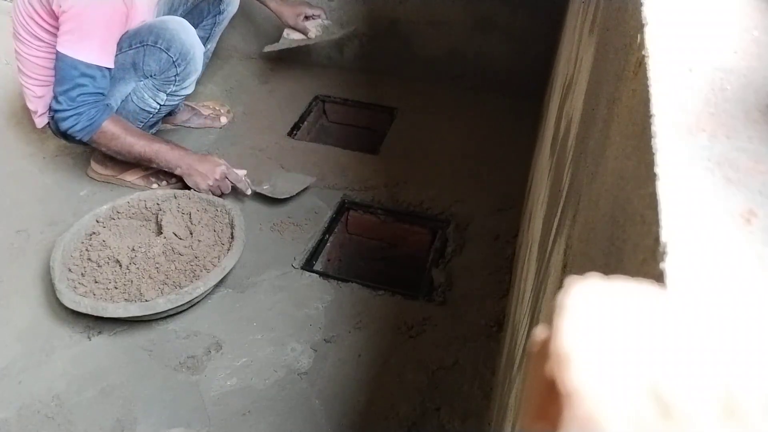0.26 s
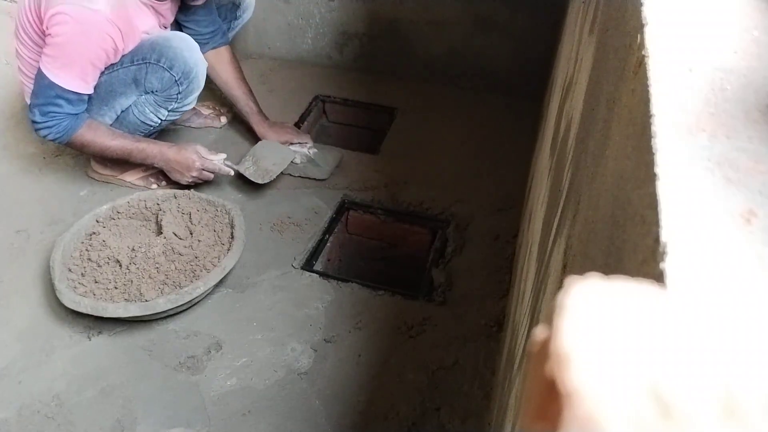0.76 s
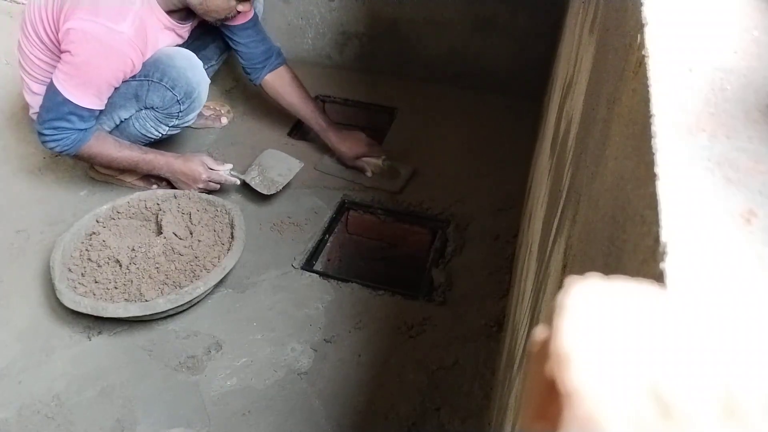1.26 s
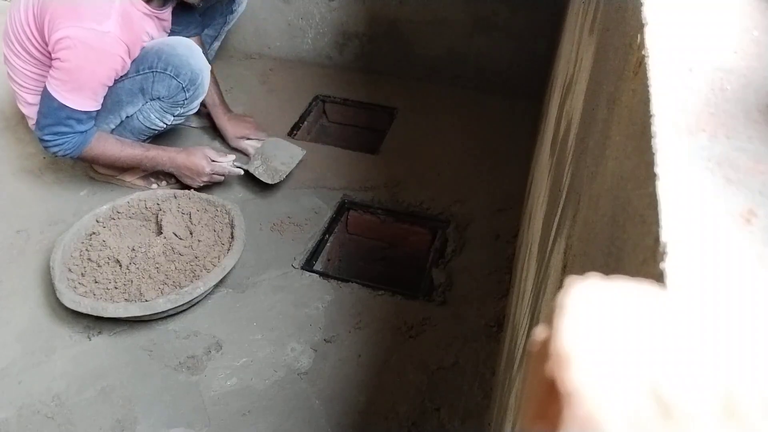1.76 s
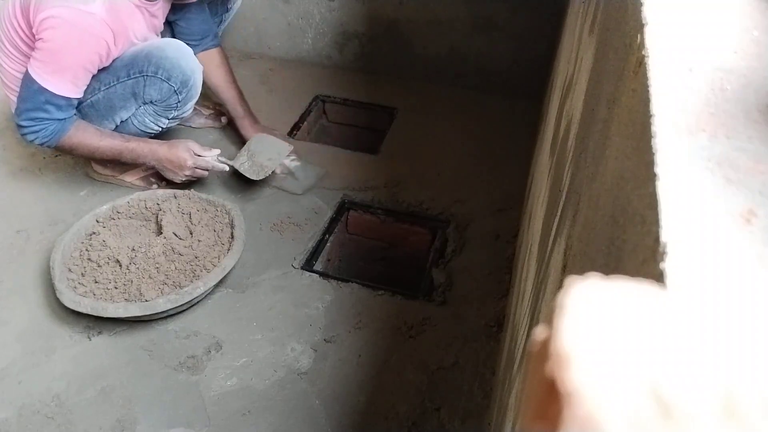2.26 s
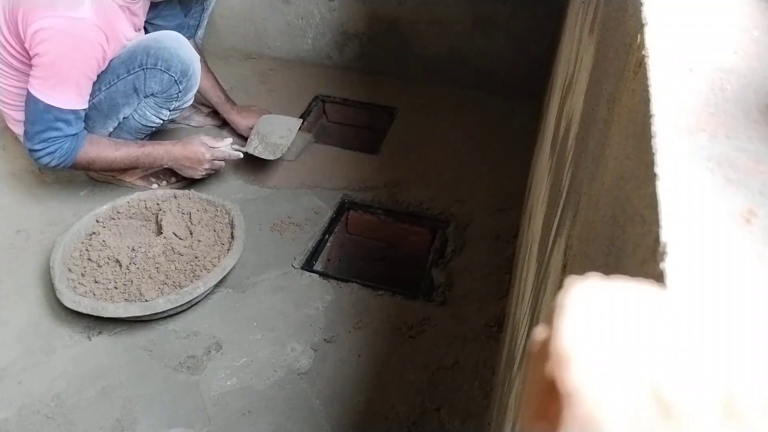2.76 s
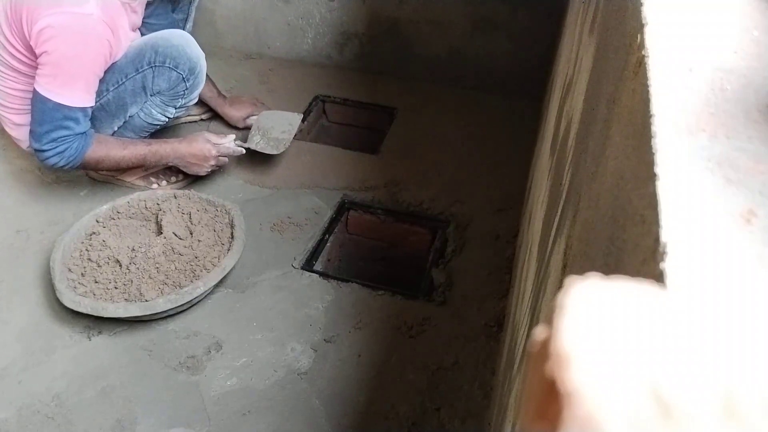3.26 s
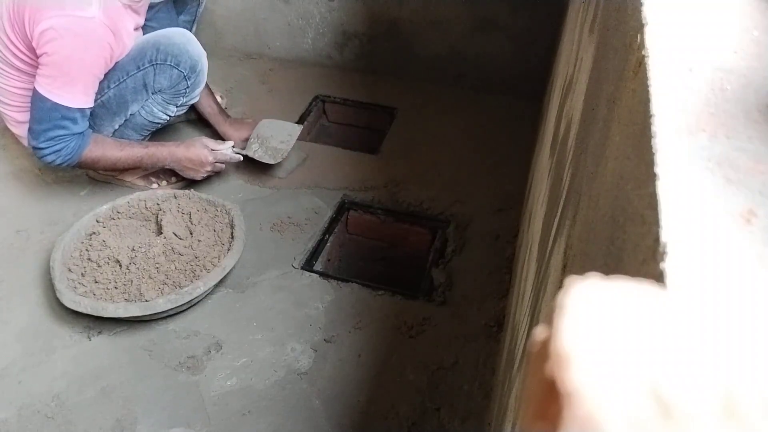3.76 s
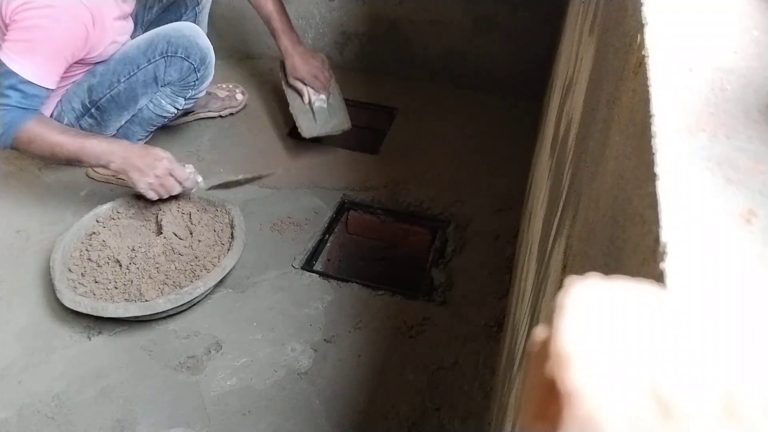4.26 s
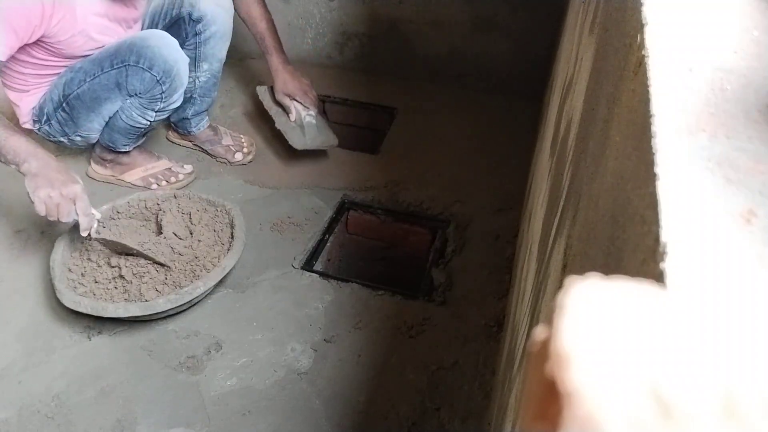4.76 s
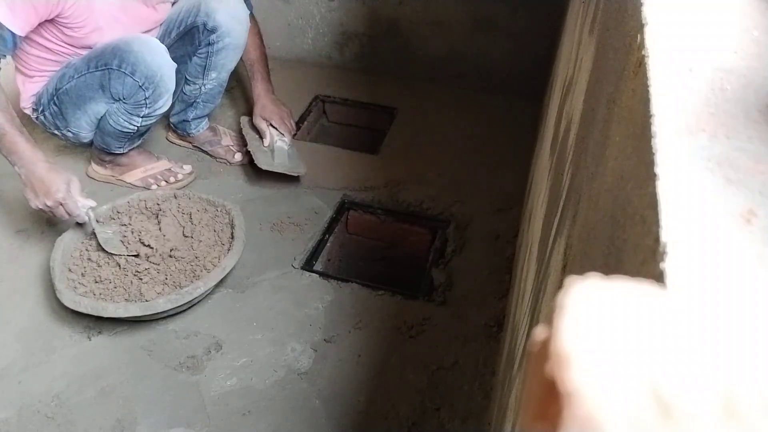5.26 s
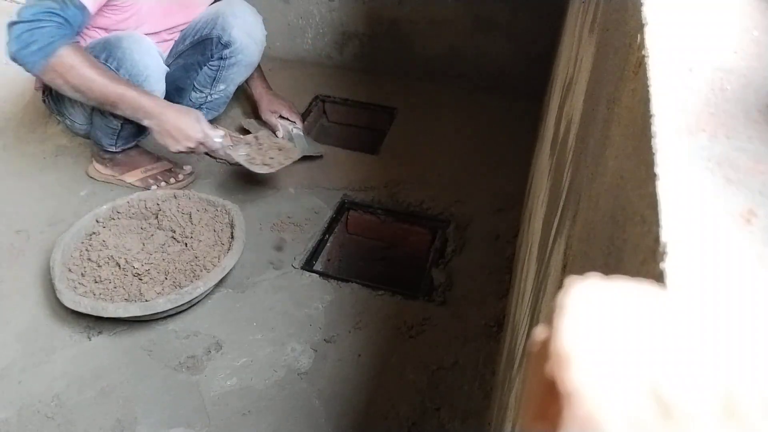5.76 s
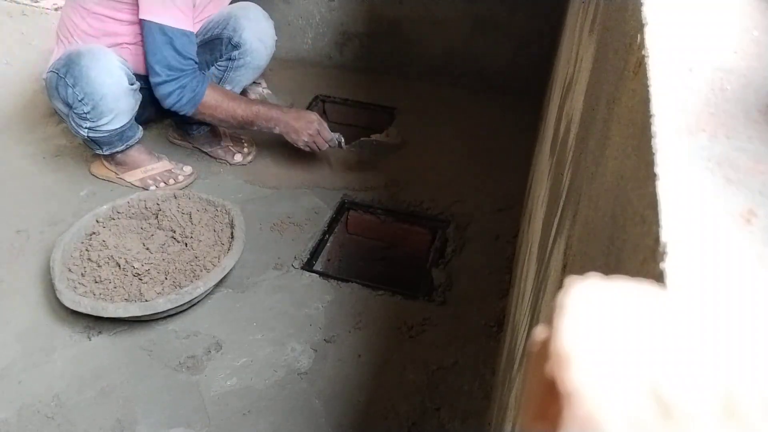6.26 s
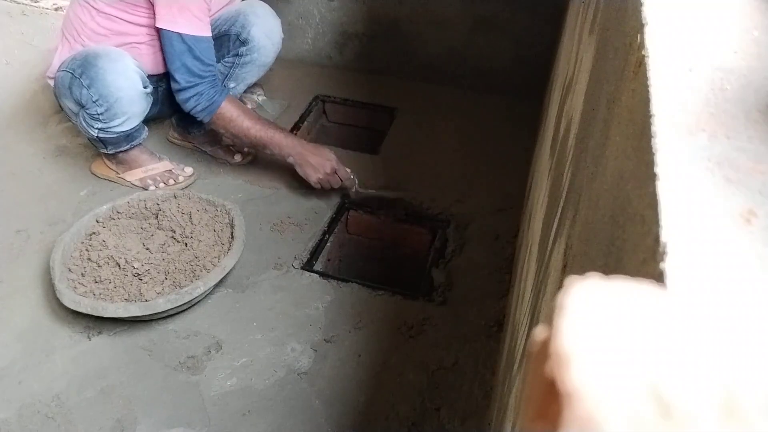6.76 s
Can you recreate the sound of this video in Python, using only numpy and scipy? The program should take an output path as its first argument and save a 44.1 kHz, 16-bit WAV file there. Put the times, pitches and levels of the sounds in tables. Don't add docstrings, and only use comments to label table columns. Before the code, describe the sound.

In a bare concrete building, a float rubs sandy mortar close to a phone. From 0 s short gritty strokes swell and fade unevenly, at about 0, 0.3, 1.1, 1.6 and 2.4 s, then closer together to 3.9 s, strongest near 3.5 s. Each has a dry mid-high rasp, fine sandy hiss and some low board tone, heaviest around 2 s. A soft bump falls at 1.5 s, a firmer double bump at 3 s. Hammer blows from another room arrive at 3.5, 4.4, 5.2, 6.05 and 6.95 s: the first softer, the second hollow, the next harder, the last thin and cut off by the ending. They come as clustered hard-wall echoes with a faint steel ring and long reverberation. Scraping becomes sparse: a light rub at 5.2 s, a sharp blade tick and brief scrape near 6.55 s, faint sandy touches at 6.9 s. Low distant rumble continues throughout, gently swelling.

```python
import sys
import numpy as np
from scipy import signal
from scipy.fft import rfft, irfft, next_fast_len
from scipy.io import wavfile
from scipy.ndimage import uniform_filter1d

SR = 44100
rng = np.random.default_rng(int(sys.argv[2]) if len(sys.argv) > 2 else 0)


def how_loud(loudness_db):
    steps = np.asarray(loudness_db, float) / 20
    return 10 ** steps


def to_wav(sig):
    pcm = np.clip(np.atleast_2d(sig), -1, 1) * 32767
    pcm = np.round(pcm).astype(np.int16)
    wavfile.write(sys.argv[1], SR, pcm.T)


N = 309141
GRID = next_fast_len(N + 2 * SR)
HZ = np.fft.rfftfreq(GRID, 1 / SR)


def unit(x):
    return x / np.sqrt(np.mean(x ** 2) + 1e-20)


def along(points, hz, axis=1):
    rows = np.transpose(points)
    return np.interp(np.log(hz + 1), np.log(rows[0] + 1), rows[axis])


def curves(rows):
    s, *columns = np.transpose(rows)
    return [np.interp(np.arange(N) / SR, s, column) for column in columns]


def filtered(x, response):
    return irfft(rfft(x, GRID) * response, GRID)[..., :N]


def resonances(modes):
    total = 0
    for k, (centre, width, db) in enumerate(modes):
        damping = 1j * HZ * width
        total = total + (-1) ** k * how_loud(db) * damping / (centre ** 2 - HZ ** 2 + damping)
    return total


def causal(gain):
    cepstrum = irfft(np.log(gain + 1e-6), GRID)
    cepstrum[1:GRID // 2] *= 2
    cepstrum[GRID // 2 + 1:] = 0
    return np.exp(rfft(cepstrum))


def patchy(depth_db):
    z = signal.stft(rng.standard_normal((2, N)), nperseg=512)[2]
    field = uniform_filter1d(rng.standard_normal(z.shape[1:]), size=6, axis=0)
    field = uniform_filter1d(field, size=10, axis=1)
    return signal.istft(z * how_loud(depth_db * unit(field)), nperseg=512)[1][:, :N]


def leftward(field, share):
    return np.array([field[0], field[1] + share * field[0]])


# (frequency [Hz], t60 [s])
ROOM_T60 = [(100, 0.87), (300, 2.3), (600, 1.36), (1200, 1.666), (1900, 1.365), (2900, 1.36), (4850, 0.97),
            (8000, 0.72), (15000, 0.51)]


def tail(faster):
    _, t, z = signal.stft(rng.standard_normal((2, 2 * SR)), SR, nperseg=512)
    decay_db = -60 * faster * t / along(ROOM_T60, np.fft.rfftfreq(512, 1 / SR))[:, None]
    return signal.istft(z * how_loud(decay_db), SR, nperseg=512)[1][:, :2 * SR]


# (peak [s], rise [s], fall [s], board level [dB], sand hiss over board [dB])
STROKES = [(0.0, .05, 0.093, -46.5, -6), (.18, 0.015, 0.069, -66, 10), (.285, 0.087, .12, -44, 1.5),
           (.62, 0.33, 0.21, -56.5, -8), (1.13, 0.16, 0.2, -47.5, -6), (1.56, 0.13, 0.28, -43, -5),
           (1.78, 0.067, 0.081, -53.5, -9), (2.05, 0.079, 0.1, -55, -15), (2.224, 0.019, 0.14, -51.5, -20),
           (2.41, 0.16, 0.24, -42.5, -5.5), (2.8, 0.09, .13, -42.5, -8), (3.05, 0.087, 0.17, -44, -9),
           (3.36, 0.068, 0.13, -47, -3), (3.5, 0.1, 0.22, -38.5, -13.5), (3.88, 0.16, 0.21, -44, -9.5),
           (4.87, 0.03, 0.25, -72.5, 6), (5.2, 0.23, 0.061, -53, 0), (5.826, .004, .006, -67, -6),
           (6.565, 0.013, 0.14, -52, -7), (6.908, 0.031, .01, -72, 0), (6.95, 0.027, 0.033, -70, 1)]


def strokes(swing, sandy):
    fade_db, roundness = 12, 1.49
    t = np.arange(0, N / SR + .002, .001)
    swell = 0
    for peak, rise, fall, db, sand_db in STROKES:
        distance = np.abs(t - peak) / np.where(t < peak, rise, fall)
        swell = swell + how_loud(db + sandy * sand_db - swing * fade_db * distance ** roundness)
    return np.interp(np.arange(N) / SR, t, swell)


def grit(spread_db, share):
    crushed = rng.random(N) < .08
    sizes = how_loud(spread_db * np.minimum(rng.exponential(size=N), 4)) * crushed
    return share * unit(sizes * rng.standard_normal((2, N))) + patchy(depth_db=.7)


def rubbed(response, spread_db, share):
    return unit(filtered(grit(spread_db, share), response))


# (frequency [Hz], width [Hz], level [dB])
BOARD = [(1960, 790, -1.5), (3080, 770, 1), (3500, 580, -1)]


def board():
    return strokes(swing=0.75, sandy=0) * rubbed(resonances(BOARD), spread_db=7, share=0.65)


# (frequency [Hz], width [Hz], level [dB])
EDGE = [(3830, 1140, 1.5), (5460, 1800, -2.5)]


def edge():
    return how_loud(-0.5) * strokes(swing=0.81, sandy=0.47) * rubbed(resonances(EDGE), spread_db=3.0, share=0.87)


# (frequency [Hz], width [Hz], level [dB])
LOW_BOARD = [(270, 68, 1), (470, 50, -8), (775, 270, -6)]
FLEX_HZ = (812, 1115, 1340)
# (time [s], low notes over board [dB], bending note [Hz])
WEIGHT = [
    (0, -14, 930),
    (.3, -8, 1280),
    (.9, -5, 980),
    (1.9, -0.5, 1000),
    (2.3, -3, 1050),
    (2.6, -5, 1120),
    (3.0, -8.5, 1310),
    (3.5, -5.5, 1214),
    (3.7, -32, 1250),
]


def low_notes():
    low_db, flex_hz = curves(WEIGHT)
    flex = 0
    for hz in FLEX_HZ:
        closeness = np.exp(-((flex_hz - hz) / 190) ** 2)
        flex = flex + closeness * rubbed(resonances([(hz, 330, 0)]) ** 2, spread_db=3.0, share=0.2)
    body = rubbed(resonances(LOW_BOARD), spread_db=4.5, share=0.29)
    return how_loud(low_db) * strokes(swing=0.55, sandy=0) * (0.7 * flex + 0.6 * body)


# (frequency [Hz], level per Hz [dB])
SAND = [(4000, -48), (6500, 4), (8000, 1), (12000, 3.5), (15500, 1.5)]


def sand():
    hiss = rubbed(how_loud(along(SAND, HZ)), spread_db=7.0, share=0.3)
    dust = filtered(hiss, 1 / (1 + (11500 / (HZ + 1)) ** 8))
    coarse = strokes(swing=0.94, sandy=0.88) * (hiss - dust)
    return coarse + how_loud(1.5) * strokes(swing=1.05, sandy=1.78) * dust


def scraping():
    near = board() + edge() + low_notes() + sand()
    walls = tail(faster=3.3)
    blur = filtered(near, rfft(walls / np.linalg.norm(walls[0]), GRID))
    return near + how_loud(-9.5) * blur


# (frequency [Hz], level per Hz [dB])
SITE = [(24, -7), (40, -2), (71, -3), (103, -0.5), (273, -14.5), (522, -18.5), (577, -14.5), (949, -17),
        (1130, -21), (2160, -17), (2450, -27), (3930, -32.5), (15500, -60.5)]
# (frequency [Hz], width [Hz], level [dB])
BOOM = [(53.3, 25, 1), (109.5, 6.8, 6.5), (176, 17, -3.5)]
# (time [s], level [dB])
RUMBLE = [(0.0, -47), (0.27, -46.5), (1.93, -43.5), (4.18, -44.5), (4.55, -38), (5.08, -46), (5.45, -37.5),
          (5.66, -43), (6.17, -44.5), (6.62, -41), (7.01, -45)]


def site():
    colour = how_loud(along(SITE, HZ)) * (1 + np.abs(resonances(BOOM)))
    rumble_db, = curves(RUMBLE)
    return how_loud(rumble_db + 2.0) * unit(filtered(patchy(depth_db=1.44), colour))


# (time [s], level [dB], frequency [Hz], t60 [s])
KNOCKS = [
    (1.46, -48, 390, 0.26),
    (2.965, -37, 276, 0.11),
    (3.0, -31.5, 260, 0.14),
    (5.824, -58, 5760, .02),
    (6.561, -36, 5100, 0.0087),
]


def knocks():
    t = np.arange(SR // 2) / SR
    sound = np.zeros((2, N + SR))
    for s, db, hz, t60 in KNOCKS:
        waver = np.cumsum(rng.normal(0, 0.026, (2, len(t))), axis=1)
        tone = np.sin(2 * np.pi * hz * t + waver)
        onset = 1 - np.exp(-t * hz / 2)
        start = round(s * SR)
        sound[:, start:start + len(t)] += how_loud(db - 60 * t / t60) * tone * onset
    return sound[:, :N]


# (frequency [Hz], level per Hz [dB])
BLOW = [(35, -36), (60, -5.5), (400, -12), (700, -8), (950, -9), (1250, -5.5), (1550, -2.5), (1850, 5.5),
        (2350, 2), (3100, -6), (3700, -11), (7800, -26), (9500, -26), (15500, -37)]
# (frequency [Hz], width [Hz], level [dB])
RING = [(158, 26, 12), (215, 15, 3), (295, 30, 0), (590, 50, 3), (775, 30, 2)]


def blow_colour(thump_db, mid_db, hardness):
    crack_db = 4 - 0.57 * mid_db
    tilt = [(300, thump_db), (700, 0.2 * thump_db), (1150, mid_db), (1700, 0), (4500, 0), (9000, crack_db)]
    wall = (1 + np.abs(resonances(RING))) / 2
    return causal(how_loud(along(BLOW, HZ / hardness) + along(tilt, HZ)) * wall)


# (time after first arrival [s], level [dB])
ECHOES = [(.008, 6.9), (.0132, 6.6), (.0176, 7.5), (.0342, 5.5), (.0448, 7.5), (.0613, 6), (.0693, 4.7),
          (.0753, 7), (.0846, 6.5), (.0877, 4.8), (.1025, 3.5)]
# (first [s], last [s])
WEAK_S = (.022, .16)


def echoes():
    late = np.linspace(0, 1, num=19) + rng.normal(0, .012, size=19)
    weak = zip(WEAK_S[0] + late * (WEAK_S[1] - WEAK_S[0]), 1 - 0.5 * late)
    walls = np.zeros((2, 2 * SR))
    for s, db in [(.002, 3.9), *ECHOES, *weak]:
        right = 0.69 + rng.normal(0, .12)
        walls[:, round((s + .0055) * SR)] = how_loud(db) * np.array([1, right])
    return walls


# (frequency [Hz], width [Hz], level [dB])
CHISEL = [(1610, 36, -1), (2006, 7.3, 12), (2076, 12, 7), (2240, 18, -3)]
# (frequency [Hz], level [dB], t60 [s])
BEAT = [(251.2, -26, 2.6), (254, -23, 2.6), (256.8, -25, 2.6)]
# (time [s], level [dB], thump [dB], mid [dB], hardness [pitch ratio])
BLOWS = [
    (3.521, -23.5, 4, 6, 0.95),
    (4.3771, -21.5, 6, -4, 1.012),
    (5.2005, -18, -0.5, 6.5, 0.99),
    (6.048, -18, 0, 4.5, 1.035),
    (6.9616, -18, -5, 1, 0.95),
]


def hammer():
    lead_in = .006
    t = np.arange(2 * SR) / SR - lead_in
    fill = np.where(t > 0, 1 - .45 * np.exp(-np.abs(t) / .08), .03)
    path = tail(faster=1.0)
    for hz, db, t60 in BEAT:
        path = path + how_loud(db - 60 * t / t60) * np.cos(2 * np.pi * hz * t) * [[1], [.3]]
    walls = how_loud(10.5) * rfft(echoes(), GRID) * resonances([(1900, 4000, 0)]) ** 2
    walls = walls * (1 + resonances(CHISEL))
    sound = np.zeros((2, N))
    for s, db, thump_db, mid_db, hardness in BLOWS:
        own = tail(faster=1.24)
        answer = rfft(fill * (path + .5 * own), GRID) + walls
        delay = np.exp(-2j * np.pi * HZ * (s - lead_in))
        blow = blow_colour(thump_db, mid_db, hardness)
        sound += how_loud(db + 19.0) * irfft(answer * delay * blow, GRID)[:, :N]
    return leftward(sound, share=0.022)


def scene():
    return leftward(scraping() + site(), share=-0.24) + knocks() + hammer()


def roll_off(x):
    return signal.sosfilt(signal.butter(12, 15800, fs=SR, output="sos"), x)


# (frequency [Hz], likeness [0-1], right leads [rad], left over right [dB])
PORTS = [(60, .95, 0, -1.5), (170, .95, .15, .5), (350, .76, .5, 2), (700, .62, 1.5, 1.5),
         (1000, .6, 2.35, 2.5), (1400, .66, 2.5, 4.5), (1700, .35, 1.8, 5.5), (2050, .54, .7, 3.5),
         (2700, .28, .35, 1), (3800, .48, -.1, -1), (5200, .25, .8, -6), (7000, .2, 2.8, -3),
         (9000, .05, 3, -1), (15000, .05, 3, -7)]
# (low [Hz], high [Hz])
BAND_HZ = (33, 15650)


def record(dry):
    alike = np.clip(along(PORTS, HZ), 0, 1)
    lead = along(PORTS, HZ, axis=2)
    balance_db = along(PORTS, HZ, axis=3)
    left, right = how_loud(balance_db / 2), how_loud(-balance_db / 2)
    turn = np.arccos(alike) / 2
    common, apart = rfft(dry, GRID) * [np.cos(turn), np.sin(turn)]
    mean = np.sqrt(left ** 2 + right ** 2 + 2 * alike * np.cos(lead)) / 2
    left_port = left * np.exp(-.5j * lead) * (common + apart) / mean
    right_port = right * np.exp(.5j * lead) * (common - apart) / mean
    band = (HZ < BAND_HZ[1]) / (1 + (BAND_HZ[0] / (HZ + 1)) ** 5)
    mix = irfft(np.array([left_port, right_port]) * band, GRID)[:, :N]
    mix = mix / (1 + np.abs(mix / .95) ** 6) ** (1 / 6)
    return roll_off(mix)


dry = scene()
out = record(dry)
to_wav(out)
```